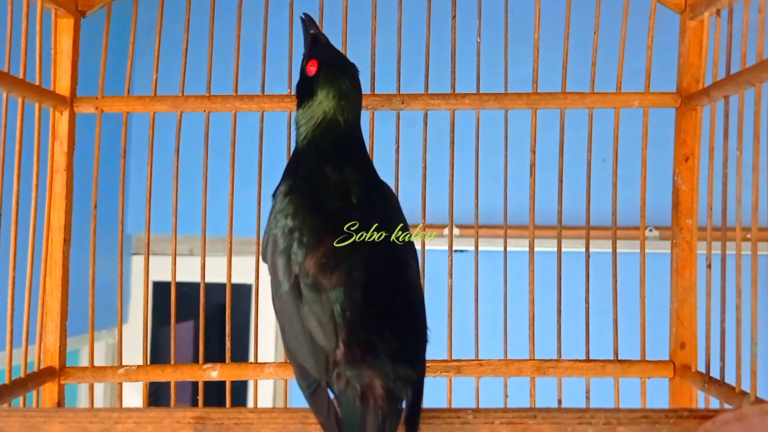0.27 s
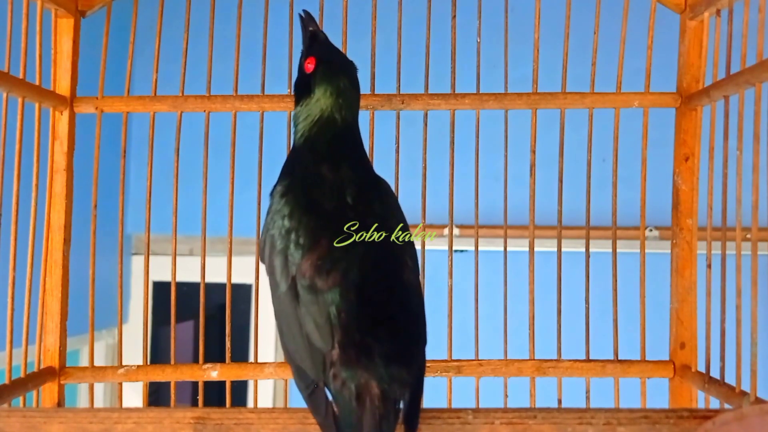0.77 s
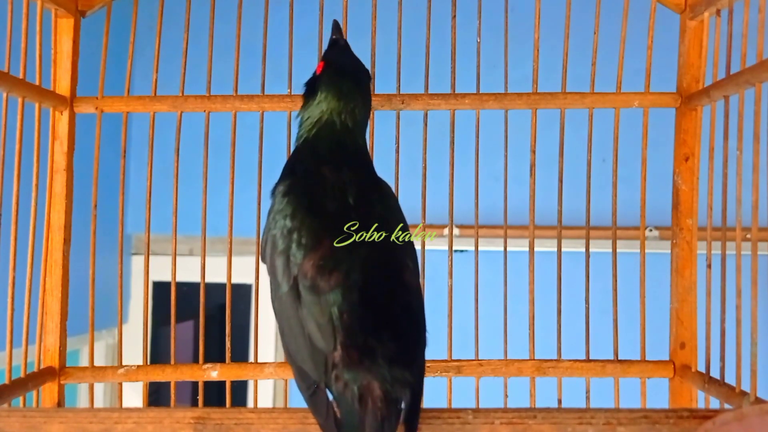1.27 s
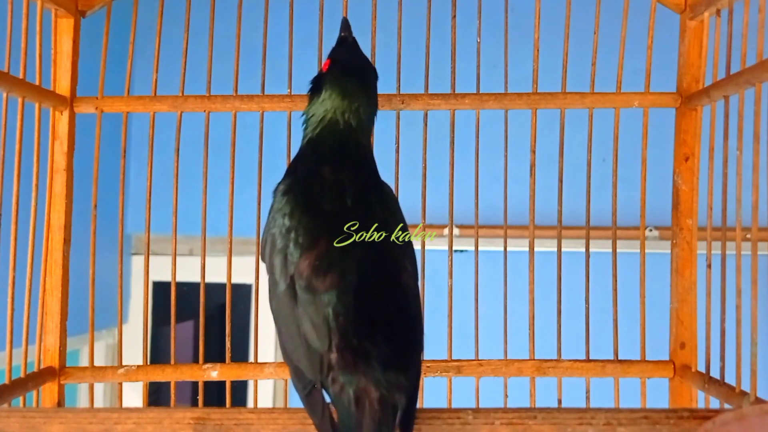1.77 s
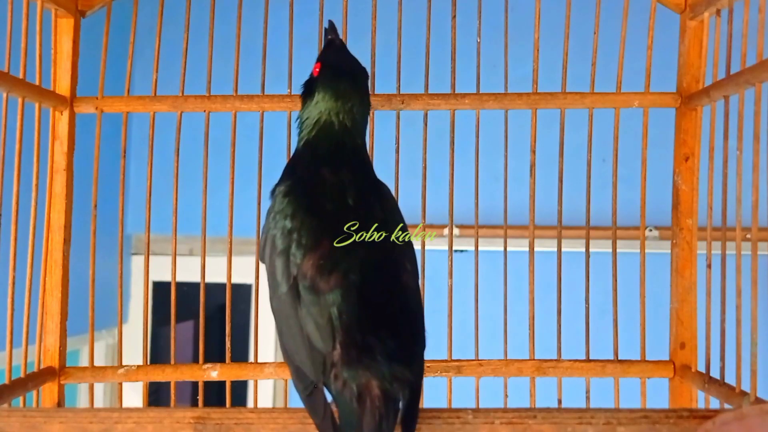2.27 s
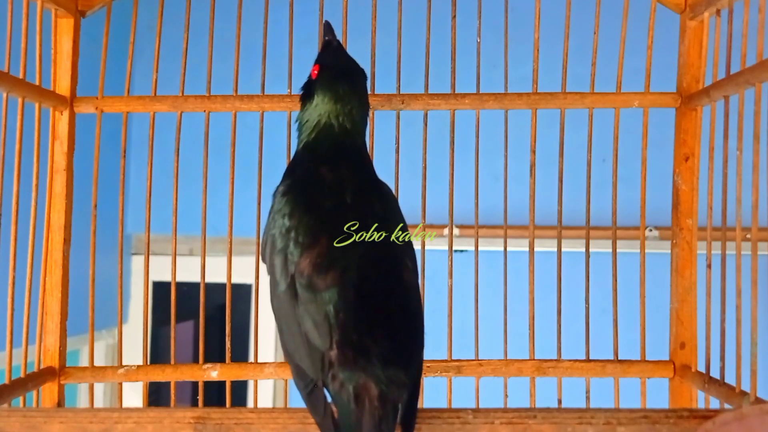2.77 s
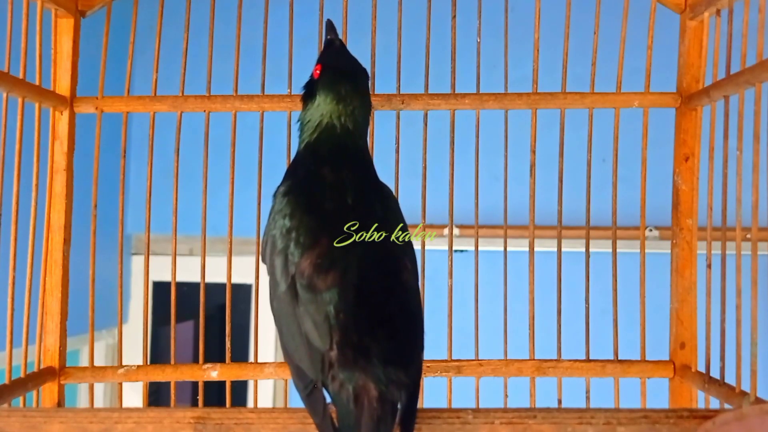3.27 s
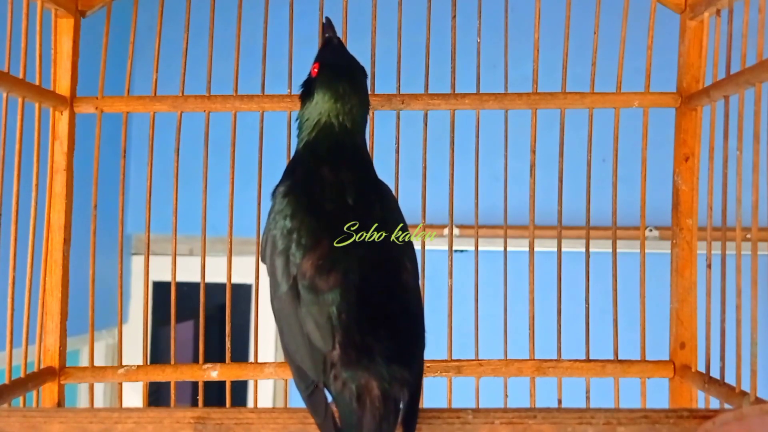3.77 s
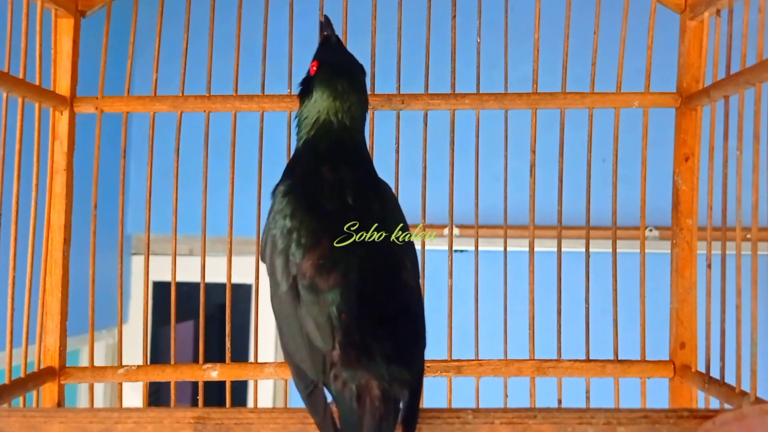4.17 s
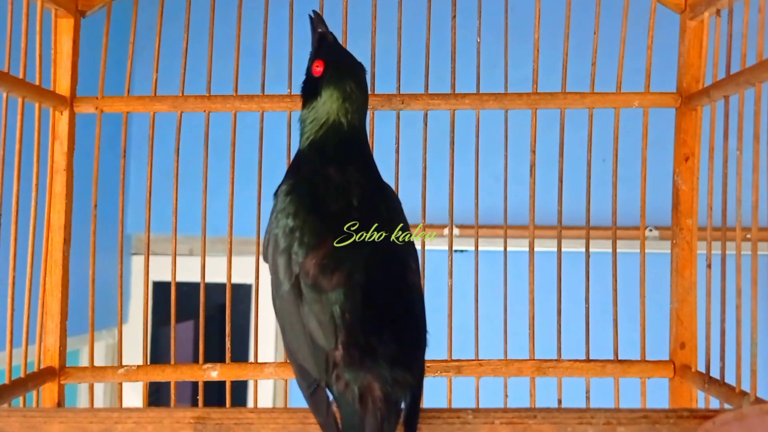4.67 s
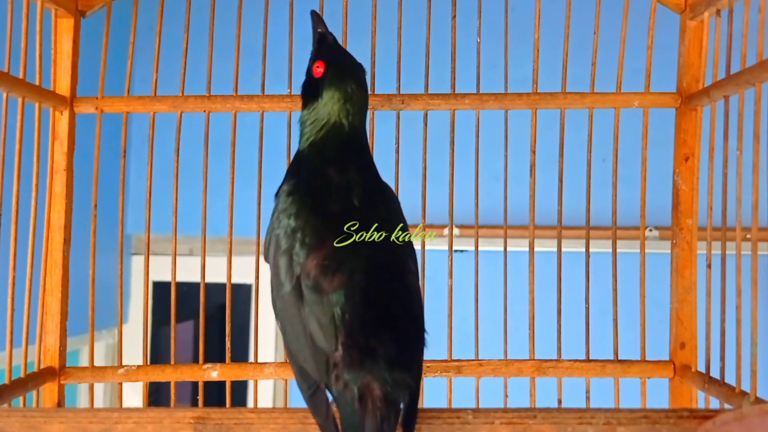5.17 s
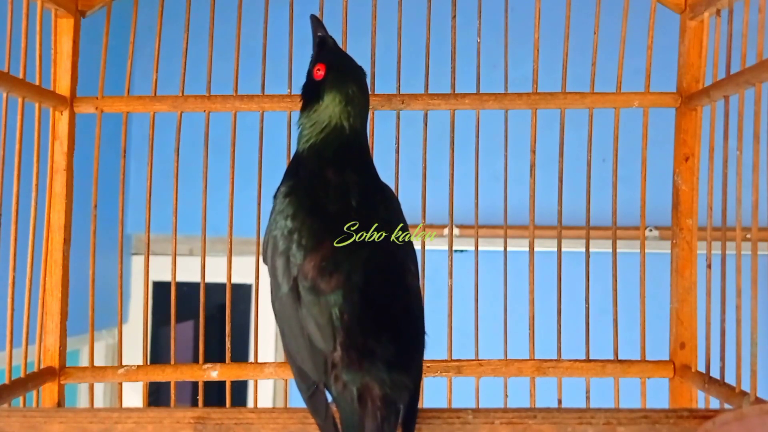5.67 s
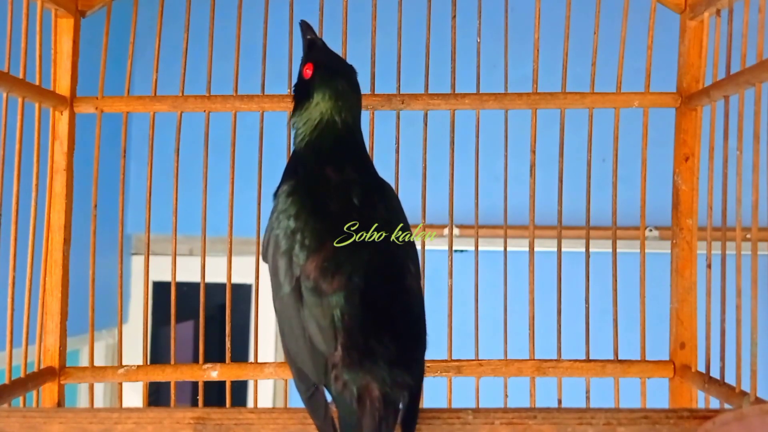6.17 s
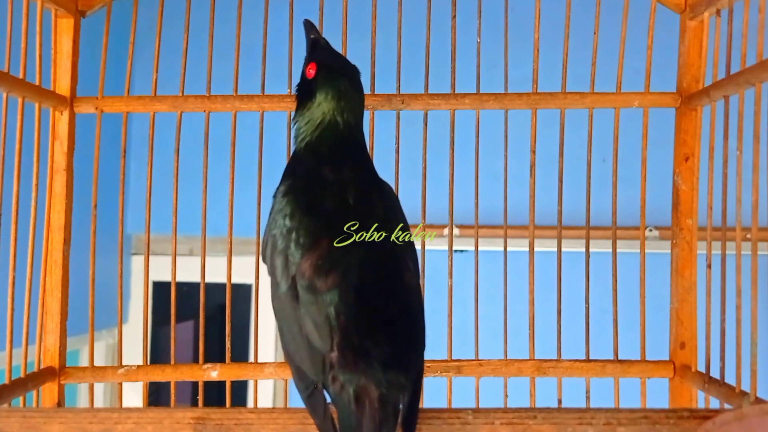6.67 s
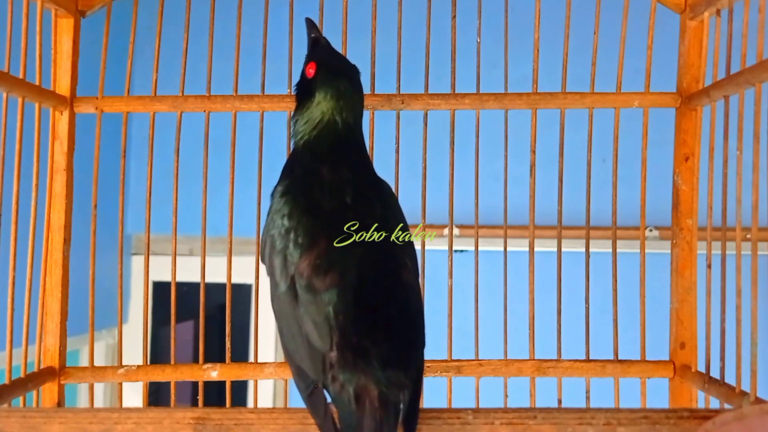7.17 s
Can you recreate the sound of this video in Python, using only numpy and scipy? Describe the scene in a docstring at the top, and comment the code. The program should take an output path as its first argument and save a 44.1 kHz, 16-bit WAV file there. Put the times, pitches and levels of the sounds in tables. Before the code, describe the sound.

A caged starling sings buzzy rasps, squeaks and piercing slurred whistles on an echoing porch, while other birds chirp and cluck.

```python
"""A caged starling sings on a hard-walled porch, close to a small microphone that its loudest whistles
overload. Its vibrating syrinx, coloured by the beak, trades falling squeaks with swelling rasps, then
gives long slurred whistles, soft pips and bill snaps. The walls ring behind every note.
Other birds chirp and cluck over a low rumble and a thin hiss."""
import sys
import numpy as np
from scipy import signal
from scipy.fft import rfft, irfft, next_fast_len
from scipy.io import wavfile
from scipy.ndimage import uniform_filter1d, map_coordinates

SR = 44100
rng = np.random.default_rng(int(sys.argv[2]) if len(sys.argv) > 2 else 0)


def store_pcm(level_fs):
    """Save levels as 16-bit WAV."""
    pcm = np.round(np.clip(level_fs, -1, 1) * 32767).astype(np.int16)
    wavfile.write(sys.argv[1], SR, np.atleast_2d(pcm).T)


N = 327663

# Tone colours of the beak, the rasp's hiss, the outdoor air and the rumble.
# Each row: frequency in Hz, gain in dB.
BEAK_EQ = [(800, 0.5), (1700, -4), (3500, 1.5), (5200, 4), (7000, 6.5), (8200, -2.5), (11000, -5),
           (13000, -16.5), (16000, -20)]
RASP_EQ = [(500, -39), (1000, -15.5), (2500, -11), (4500, -6), (6300, -0.5), (7200, -2), (8300, -27),
           (10300, -21.5), (12300, -56), (15000, -33)]
AIR_EQ = [(180, -36), (300, -7), (713, -24.5), (915, -4), (1460, -8), (1970, -7), (2140, -13.5),
          (2570, -10), (3640, -7.5), (4020, -0.5), (4370, -5), (7080, -6), (10000, -16), (13500, -35.5),
          (15000, -20), (16000, -27.5)]
RUMBLE_EQ = [(15, -58.5), (25, -33.5), (49, -19.5), (103, -1), (141, -4.5), (179, -12.5), (219, -10),
             (248, -15.5), (409, -52.5), (500, -21), (650, -27.5), (1100, -120)]
# Voices ahead of the beak's colour. Each row: harmonic number, relative level in dB.
OPEN_TWANG_VOICE = [(1, -1), (2, -1.5), (3, -11), (4, 3), (5, -10), (6, -22)]
SHUT_TWANG_VOICE = [(1, 2), (2, 5.5), (3, -19), (4, -15), (5, -12.5), (6, -23)]
SQUEAK_VOICE = [(1, 5), (2, -3), (3, -5.5), (4, -0.5), (5, -13.5), (6, -19)]
UPSLUR_VOICE = [(1, -5.5), (2, -25), (3, -33)]
PURE_VOICE = [(1, -12.5), (2, -35.5)]
# Note gestures. Each row: share of the note's length, pitch ratio, gain in dB.
TWANG_SHAPE = [(0, .96, -5), (.35, .985, -1.5), (.7, 1.01, -0.5), (.85, 1, -0.5), (1, 0.793, -10.5)]
CHIRP_SHAPE = [(0, 0.6, -7.5), (.12, .76, -15), (.27, .9, -12), (.31, .93, -1.5), (.52, 0.97, -7),
               (.72, 0.98, -4), (.9, 1, -2.5), (1, 0.93, -22.5)]
CLUCK_SHAPE = [(0, .93, -18.5), (.35, 1.01, 2), (.7, 1, -7), (1, .93, -10.5)]
SQUEAK_SHAPE = [(0, 1.02, -18), (.2, 1, -1), (.55, .985, 0), (.76, .94, 4), (.88, 0.762, 0), (1, 0.49, -27)]
PIP_SHAPE = [(0, 1.001, 3.5), (.3, 1, 0.5), (.7, 1, -10), (1, 1.02, -16)]
# Swells of hiss that break into a twang. Each row: time of the break in seconds, base hiss level in dB,
# twang pitch in Hz, base twang level in dB, beak closing from 0 to 1.
RASPS = [(0.013, -20, 1958, -21.5, 1), (.335, -22, 2049, -20, 1), (.655, -15.5, 1952, -15.5, 1),
         (0.994, -21, 1884, -24.5, 0.7), (4.087, -21, 1786, -22, 0.08), (4.472, -19.5, 1965, -22.5, 0.98),
         (4.777, -17.5, 1972, -17, 1), (5.107, -16, 1956, -20.5, 0.6)]
# Fader moves for the rumble and the air. Each row: time in seconds, base level in dB.
RUMBLE_FADER = [(0.1, -49), (1.87, -47.5), (3.02, -50.5), (3.63, -43.5), (4.71, -48.5), (5.0, -42.5),
                (5.37, -49.5), (7.43, -45.5)]
AIR_FADER = [(0, -37), (1.3, -41), (3.3, -42), (4.6, -40.5), (6.7, -42.5)]
# The bed sinks under the two high whistles. Each row: start in seconds, nominal length in seconds.
LULLS = [(2.317, 2.1), (6.14, 0.64)]
# The air's hollow colour. Each row: frequency in Hz, ripple depth in dB.
HOLLOW_RIPPLE = [(2000, 1.5), (3000, 5.5), (5000, 3.5), (12000, 3)]
# Cues for the short notes. Each row: start in seconds, base pitch in Hz, base level in dB.
CLUCKS = [(.104, 784, -34.5), (.557, 817, -37.5), (1.276, 1110, -33), (1.521, 910, -30.5),
          (2.189, 1001, -33), (2.592, 1037, -33), (2.746, 975, -31.5), (3.281, 953, -32), (3.474, 972, -31),
          (4.107, 992, -32.5), (4.514, 920, -27.5), (4.658, 920, -33), (5.783, 1403, -31),
          (6.764, 784, -36)]
SQUEAKS = [(0.164, 1749, -18), (.472, 1675, -16.5), (0.81, 1723, -16.5), (3.907, 1862, -22.5),
           (4.284, 1757, -18.5), (4.591, 1757, -15.5), (4.931, 1730, -18)]
PIPS = [(2.795, 2216, -18.5), (2.886, 3056, -19), (6.826, 1271, -29), (6.971, 1202, -31),
        (7.135, 1241, -30), (7.265, 1163, -31), (7.403, 1170, -26.5)]
# Longer far calls. Each row: start in seconds, length in seconds, pitch in Hz, level in dB.
FAR_CALLS = [(.86, .59, 342, -53), (1.82, .1, 2052, -35), (5.718, .06, 2527, -40.5)]
# The paths of the three whistles. Each row: time in seconds, pitch in Hz, relative level in dB.
UPSLUR = [(1.485, 1627, -38), (1.524, 2200, -20.5), (1.535, 2413, -10.5), (1.55, 2720, -22),
          (1.577, 3063, -5.5), (1.595, 3102, -15), (1.614, 3216, -25)]
HELD_WHISTLE = [(2.302, 5950, -14.5), (2.322, 5550, -10.5), (2.35, 5496, -3), (2.385, 5474, 2.5),
                (2.43, 5178, -6.5), (2.59, 5253, -14), (2.607, 5075, -6.5)]
DOWNSLUR = [(6.043, 6750, -22.5), (6.064, 6680, -19.5), (6.072, 6480, -7), (6.105, 6660, -6.5),
            (6.16, 6060, -10.5), (6.235, 5000, -13), (6.32, 4313, -20.5), (6.425, 3220, -18),
            (6.49, 2870, -27)]
# Bill snaps. Each row: start in seconds, level in dB, resonance in Hz, time to fall 60 dB in seconds.
SNAPS = [(2.794, -21, 2050, 0.032), (6.791, -34, 4940, .1), (6.872, -30.5, 6300, 0.24),
         (7.011, -37, 3250, 0.23)]
# Low pips have the stronger octave. Each row: pitch in Hz, relative second-harmonic level in dB.
PIP_OCTAVE = [(1150, 1.5), (1300, -5.5), (2200, -22), (3000, -16)]
# The ring of the walls. Each row: frequency in Hz, time to fall 60 dB in seconds.
PORCH_DECAY = [(200, 0.85), (1000, 0.31), (2500, 0.53), (5000, 0.45), (8000, 0.2), (14000, 0.28)]

TOP_HZ = 15650


def amp(db):
    """Decibels to gain."""
    return 10 ** (np.asarray(db) / 20)


def unit(x):
    """Scale to rms 1."""
    return x / np.sqrt(np.mean(x ** 2) + 1e-20)


def along(points, hz):
    """Read (Hz, value) points on a log axis."""
    f, v = np.transpose(points)
    return np.interp(np.log(hz + 1), np.log(f + 1), v)


def curves(rows, t):
    """Each column after the first, read at the times t."""
    times, *columns = np.transpose(rows)
    return [np.interp(t, times, column) for column in columns]


def clock(length):
    """The sample times of a note."""
    return np.arange(int(length * SR)) / SR


def wobble(n, rate):
    """A smooth random curve of n samples, rate knots a second."""
    return map_coordinates(rng.standard_normal(int(n * rate / SR) + 4), [np.arange(n) * rate / SR])


def noise(n, eq):
    """Coloured noise of rms 1."""
    m = next_fast_len(n + 1024)
    gain = amp(along(eq, np.fft.rfftfreq(m, 1 / SR)))
    return unit(irfft(rfft(rng.standard_normal(m)) * gain, m)[:n])


def resonant_noise(hz, width_hz):
    """Noise of rms 1 in one narrow resonance whose centre follows hz."""
    drive = wobble(len(hz), width_hz) + 1j * wobble(len(hz), width_hz)
    return unit(np.real(drive * np.exp(2j * np.pi * np.cumsum(hz) / SR)))


def add(track, start, sound):
    """Mix a sound in with 2 ms fades at its ends."""
    i = np.arange(len(sound))
    fade = np.clip(np.minimum(i, i[::-1]) / (.002 * SR), 0, 1)
    at = i + round(start * SR)
    inside = (at >= 0) & (at < N)
    track[at[inside]] += (sound * fade)[inside]


def syrinx(hz, db, voice, jitter, jitter_rate):
    """A vibrating membrane with a trembling pitch; its harmonics pass through the beak."""
    phase = 2 * np.pi * np.cumsum(hz * (1 + jitter * wobble(len(hz), jitter_rate))) / SR
    tone = 0
    for k, (_, harmonic_db) in enumerate(voice, 1):
        gain = amp(harmonic_db + along(BEAK_EQ, k * hz)) * (k * hz < TOP_HZ)
        tone += gain * np.sin(k * phase + rng.uniform(0, 2 * np.pi))
    return amp(db) * unit(tone)


def note(shape, length, hz, db, voice, jitter, jitter_rate):
    """One sung gesture, stretched to a length in seconds and set to a pitch and level."""
    ratio, swell_db = curves(shape, clock(length) / length)
    return syrinx(hz * ratio, db + swell_db, voice, jitter, jitter_rate)


def rasps(swell_s=.11, twang_s=.045):
    """Chaotic vibration swells, then locks into a twang as the beak closes."""
    out = np.zeros(N)
    t = clock(swell_s + twang_s)
    gesture = [(0, -19, 0), (swell_s * .75, -2, .06), (swell_s, 0, .2),
               (swell_s + twang_s * .63, -2, .9), (swell_s + twang_s, -6, 1)]
    effort_db, shut = curves(gesture, t)
    for break_s, hiss_db, hz, twang_db, closing in RASPS:
        # the closing beak trades its high resonance for a low one
        closed = closing * shut
        high = amp(-5.5 - 3.4 * shut) * resonant_noise(6520 - 890 * closed, width_hz=800)
        low = amp(-3) * closed * resonant_noise(np.full(len(t), 3440), width_hz=750)
        broad = amp(-2.5 - 8.3 * shut) * noise(len(t), RASP_EQ)
        flutter = unit(amp(2 * wobble(len(t), 352.4)))
        add(out, break_s - swell_s, amp(hiss_db + effort_db) * (high + low + broad) * flutter)
        # an open beak favours the fourth harmonic, a closing one the second
        voice = closing * np.array(SHUT_TWANG_VOICE) + (1 - closing) * np.array(OPEN_TWANG_VOICE)
        add(out, break_s, note(TWANG_SHAPE, twang_s, hz, twang_db, voice, jitter=.01, jitter_rate=855))
    return out


def lull():
    """Depth, 0 to 1, of the dips in the bed: a quick fall, a hold and a gradual return."""
    t = np.arange(N) / SR
    return sum(np.interp(t, [start - .05, start, start + length * .6, start + length * 1.2], [0, 1, 1, 0])
               for start, length in LULLS)


def hollow(x, spacing_hz):
    """A hollow colour: evenly spaced peaks and valleys in the spectrum."""
    hz = np.fft.rfftfreq(N, 1 / SR)
    ripple_db = -along(HOLLOW_RIPPLE, hz) * np.cos(2 * np.pi * hz / spacing_hz)
    return unit(irfft(rfft(x) * amp(ripple_db), N))


def outdoor_bed():
    """A low rumble and a thin, hollow, slowly wavering hiss."""
    t, dip = np.arange(N) / SR, lull()
    rumble_db = curves(RUMBLE_FADER, t)[0] - 3.5 * dip + 1.6 * wobble(N, 17)
    air_db = curves(AIR_FADER, t)[0] - 1.5 * dip + .83 * wobble(N, 4.6)
    rumble = amp(rumble_db) * noise(N, RUMBLE_EQ)
    return rumble + amp(air_db) * hollow(noise(N, AIR_EQ), spacing_hz=1120)


def chirps(first_s=.052, every_s=.2153, length_s=.112, db=-23):
    """A second bird's even run of ten arched chirps, creeping up in pitch."""
    out = np.zeros(N)
    voice = [(1, -7.5), (2, -44)]
    for start in first_s + every_s * np.arange(10):
        peak_hz = 3377 + 40 * start
        add(out, start, note(CHIRP_SHAPE, length_s, peak_hz, db, voice, jitter=.014, jitter_rate=450))
    return out


def clucks(length_s=.025, faint_per_s=2.5, faint_hz=928, faint_db=-40):
    """Hoarse clucks of farther birds: clear ones on cue, faint ones scattered among them."""
    out = np.zeros(N)
    count = int(faint_per_s * N / SR)
    starts = (np.arange(count) + rng.random(count)) / faint_per_s
    pitches = faint_hz * 2 ** (.22 * rng.standard_normal(count))
    faint = [(start, hz, faint_db) for start, hz in zip(starts, pitches)]
    voice = [(1, -1), (2, -20.5), (3, -15.5)]
    for start, hz, db in CLUCKS + faint:
        add(out, start, note(CLUCK_SHAPE, length_s, hz, db, voice, jitter=.033, jitter_rate=678))
    return out


def far_calls():
    """Three distant calls, each quavering around one pitch."""
    out = np.zeros(N)
    for start, length, hz, db in FAR_CALLS:
        voice = [(1, 0), (2, along([(350, -1.5), (2000, -22)], hz))]
        add(out, start, syrinx(np.full(int(length * SR), hz), db, voice, jitter=.045, jitter_rate=260))
    return out


def chatter(count=130):
    """A random sprinkle of tiny notes from distant birds, sinking in the lulls."""
    out = np.zeros(N)
    voice = [(1, -7.5), (2, -11)]
    for when, pitch, distance, span in rng.random((count, 4)):
        length, hz, db = .02 + .0538 * span, 1100 * 2.5 ** pitch, -9 * distance
        add(out, when * N / SR, note(CLUCK_SHAPE, length, hz, db, voice, jitter=.044, jitter_rate=610))
    return amp(-46 - 11.5 * lull()) * unit(out)


def squeaks(length_s=.0235, clack_s=.0094):
    """Reedy notes that hold for a moment, then collapse in pitch and end in a noisy clack."""
    out = np.zeros(N)
    t = clock(clack_s)
    clack_eq = [(400, -31), (1000, 10.5), (2200, 2.5), (6500, -5), (8500, -5), (14000, -26.5)]
    for start, hz, db in SQUEAKS:
        add(out, start, note(SQUEAK_SHAPE, length_s, hz, db, SQUEAK_VOICE, jitter=.019, jitter_rate=1300))
        clack = amp(db - 6.5 - 60 * t / .076) * noise(len(t), clack_eq)
        add(out, start + length_s * .9, clack)
    return out


def glide(path):
    """Pitch and level along a whistle's path."""
    start, end = path[0][0], path[-1][0]
    return curves(path, start + clock(end - start))


def whistles():
    """Three loud slurs; the high ones are almost pure, and overtones grow as the last one sinks."""
    out = np.zeros(N)
    add(out, UPSLUR[0][0], syrinx(*glide(UPSLUR), UPSLUR_VOICE, jitter=.006, jitter_rate=400))
    add(out, HELD_WHISTLE[0][0], syrinx(*glide(HELD_WHISTLE), PURE_VOICE, jitter=.0075, jitter_rate=340))
    hz, db = glide(DOWNSLUR)
    octave_db = along([(3000, -16.5), (3900, -7.5), (4800, -29.5), (6500, -29)], hz)
    voice = [(1, .016), (2, octave_db), (3, octave_db - 15)]
    add(out, DOWNSLUR[0][0], syrinx(hz, db, voice, jitter=.0023, jitter_rate=270))
    return out


def bill_snaps():
    """Quick noisy snaps, each ringing in one broad resonance."""
    out = np.zeros(N)
    for start, db, hz, t60 in SNAPS:
        t = clock(t60)
        eq = [(hz / 4, -30), (hz * .53, -15), (hz, 0), (hz * 1.12, -18), (hz * 2, -35)]
        add(out, start, amp(db - 60 * t / t60) * noise(len(t), eq))
    return out


def pips(length_s=.027):
    """Short notes of steady pitch that follow the high whistles."""
    out = np.zeros(N)
    for start, hz, db in PIPS:
        voice = [(1, 2.5), (2, along(PIP_OCTAVE, hz)), (3, -21)]
        add(out, start, note(PIP_SHAPE, length_s, hz, db, voice, jitter=.0062, jitter_rate=560))
    return out


def porch(x, early_db, tail_db):
    """Near walls return a cluster of quick copies, then a diffuse tail that dies faster in the treble."""
    hz, t, bands = signal.stft(rng.standard_normal(int(.8 * SR)), SR, nperseg=256)
    decay = amp(-60 * t / along(PORCH_DECAY, hz)[:, None])
    tail = signal.istft(bands * decay, SR, nperseg=256)[1]
    tail *= np.clip(np.arange(len(tail)) / SR / .011, 0, 1)  # 11 ms fade-in
    response = amp(tail_db) * tail / np.linalg.norm(tail)
    delays = rng.uniform(.002, .035, size=40)
    copies = rng.standard_normal(len(delays)) * np.exp(-delays / .014)
    response[(delays * SR).astype(int)] += amp(early_db) * copies / np.linalg.norm(copies)
    return x + signal.fftconvolve(x, response)[:N]


def limiter(x, threshold_db, window_s):
    """Loud notes duck the whole mix by their rms level; quick peaks slip through."""
    size = int(window_s * SR)
    level = np.sqrt(np.abs(uniform_filter1d(x ** 2, size)))
    gain = np.minimum(1, amp(threshold_db) / (level + 1e-9))
    return x * uniform_filter1d(gain, size)


def scene():
    """The whistles beam straight at the microphone; the chirps come mostly by way of the walls."""
    birds = porch(amp(-.5) * whistles(), early_db=-3.5, tail_db=-5)
    birds += porch(squeaks() + rasps() + bill_snaps(), early_db=-8.5, tail_db=-6)
    birds += porch(pips(), early_db=.5, tail_db=-1)
    birds += porch(clucks() + far_calls() + chatter(), early_db=-3.5, tail_db=-2)
    birds += porch(chirps(), early_db=4, tail_db=-2)
    return (birds + outdoor_bed())[None]


def record(dry):
    """The loudest whistles hit the limiter and crackle as they clip; all above TOP_HZ is cut."""
    held = limiter(dry, threshold_db=-5, window_s=.025)
    ceiling, hardness = .79, 12
    clipped = held / (1 + np.abs(held / ceiling) ** hardness) ** (1 / hardness)
    m = next_fast_len(N + 4096)
    passband = np.fft.rfftfreq(m, 1 / SR) < TOP_HZ
    return irfft(rfft(clipped, m) * passband, m)[..., :N]


dry = scene()
out = record(dry)
store_pcm(out)
```